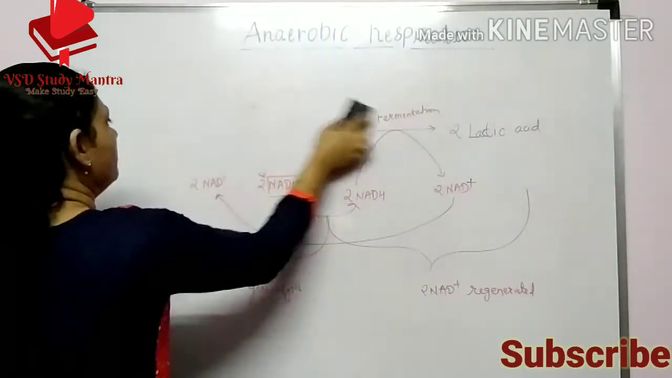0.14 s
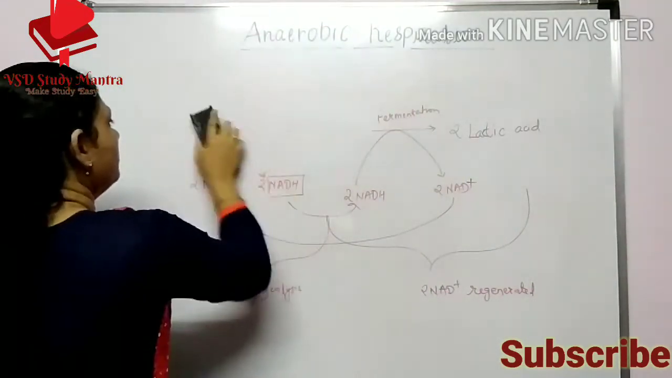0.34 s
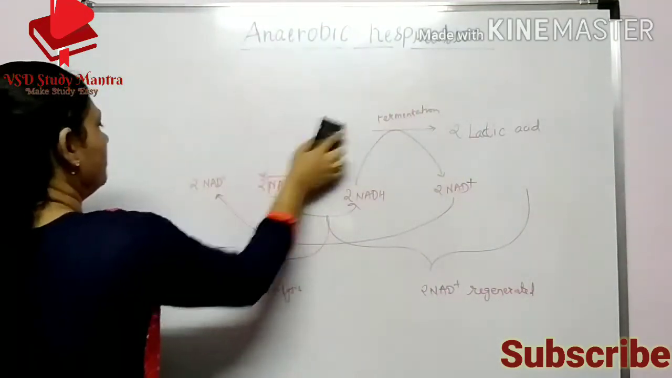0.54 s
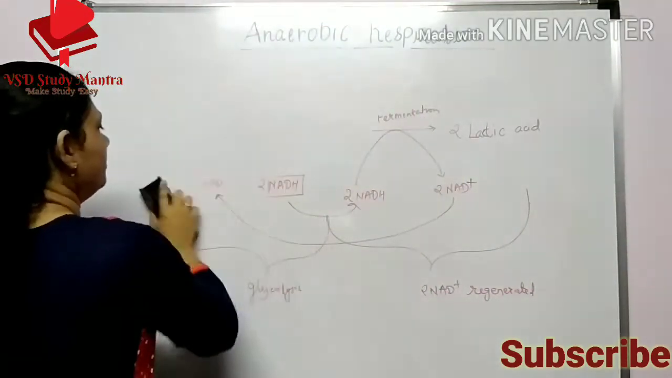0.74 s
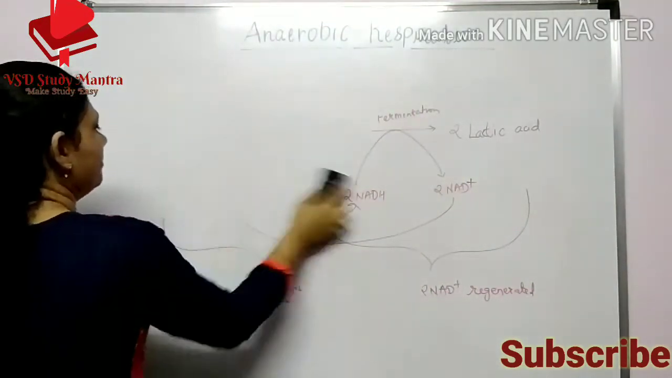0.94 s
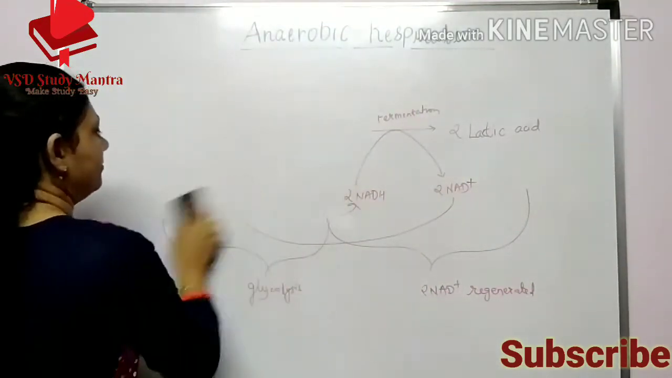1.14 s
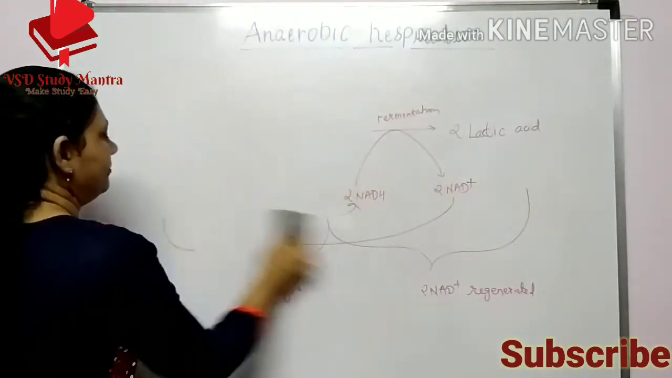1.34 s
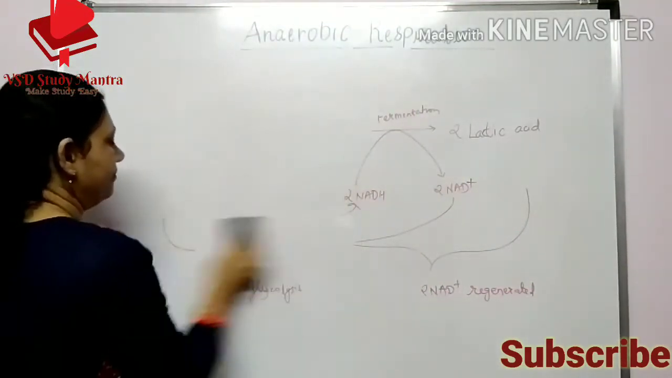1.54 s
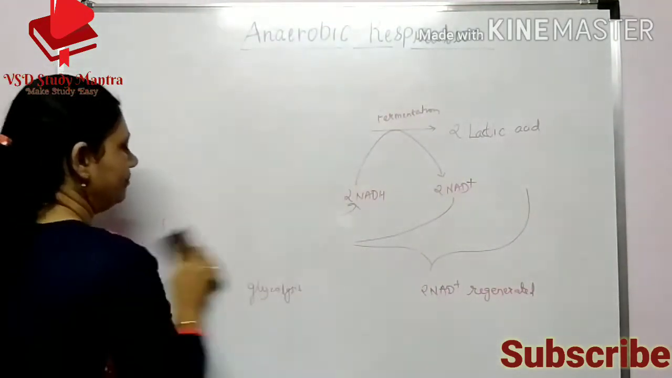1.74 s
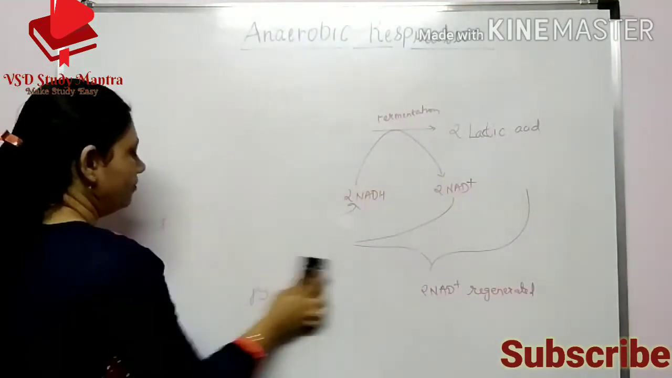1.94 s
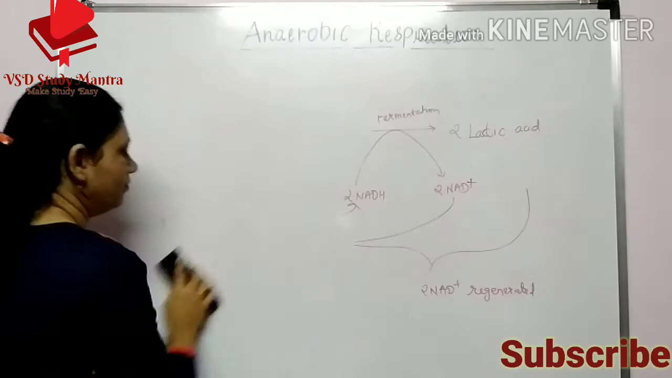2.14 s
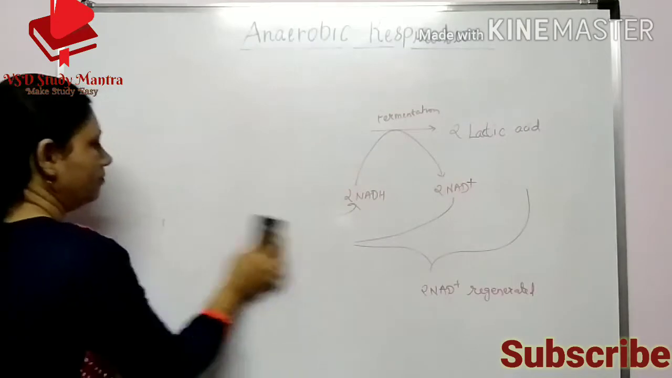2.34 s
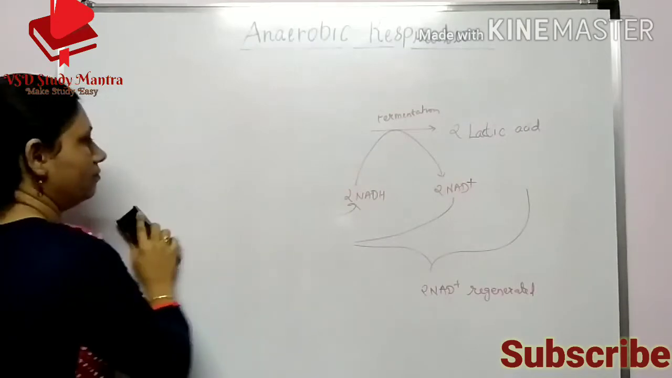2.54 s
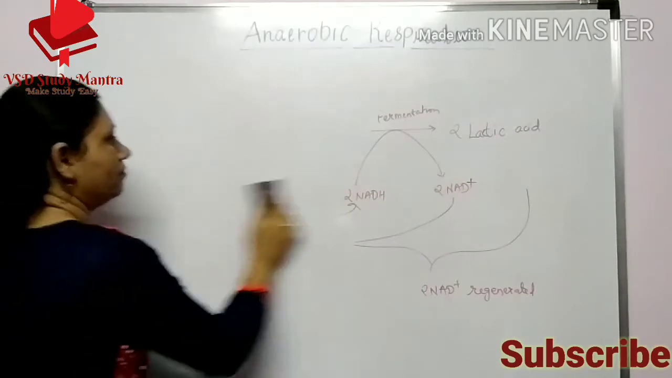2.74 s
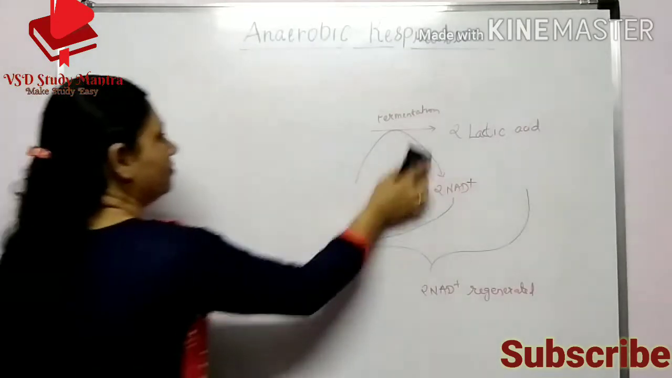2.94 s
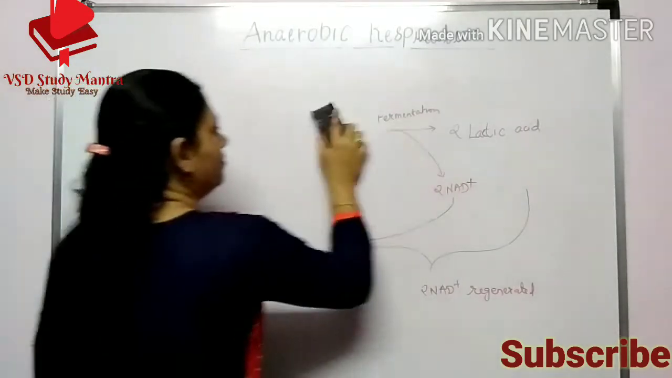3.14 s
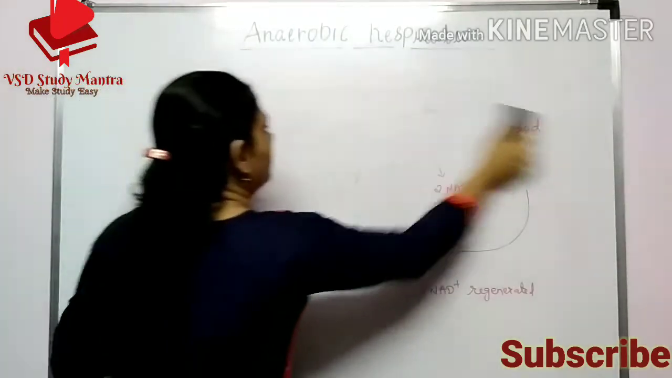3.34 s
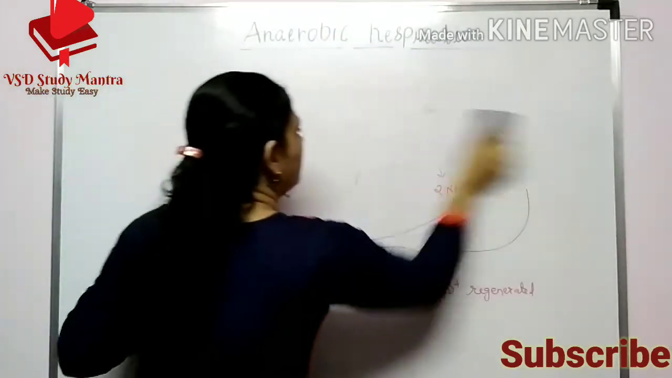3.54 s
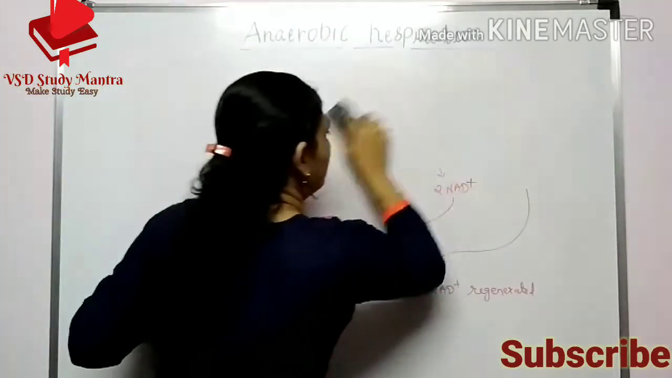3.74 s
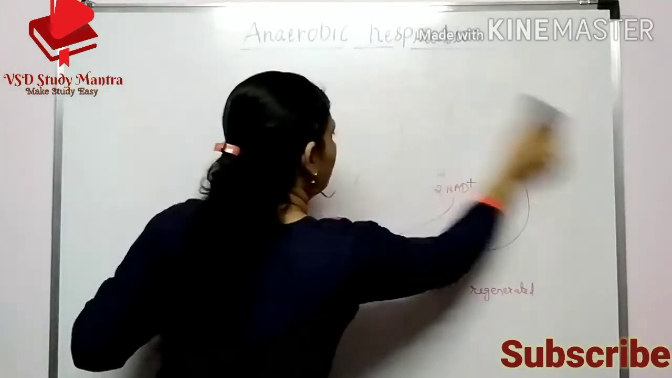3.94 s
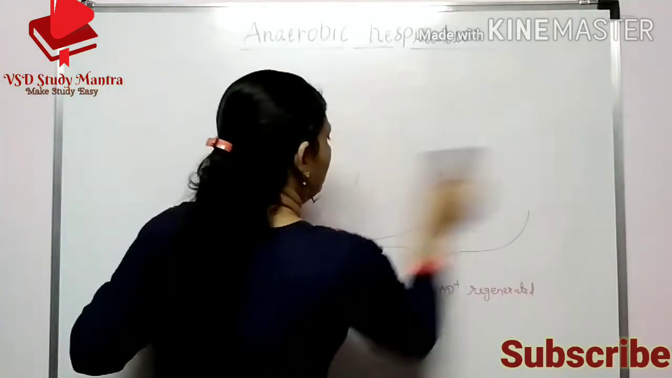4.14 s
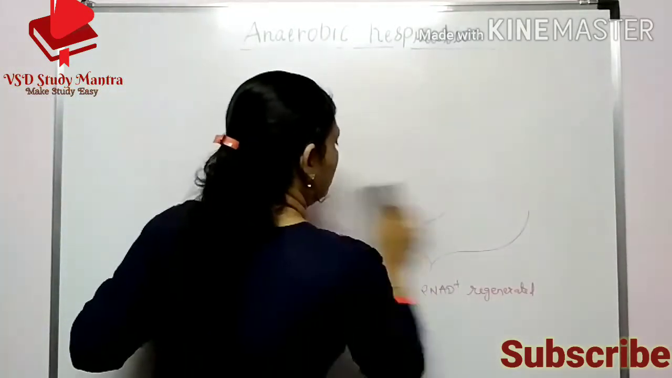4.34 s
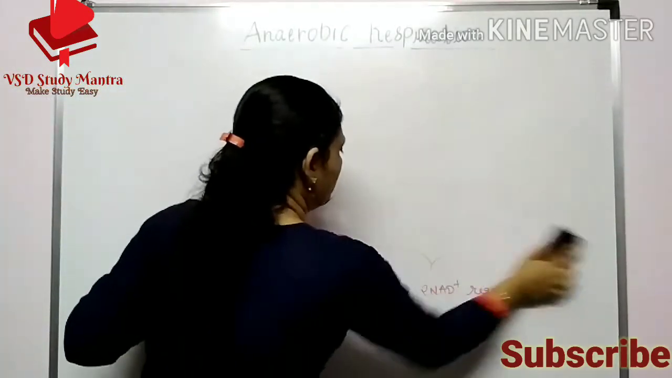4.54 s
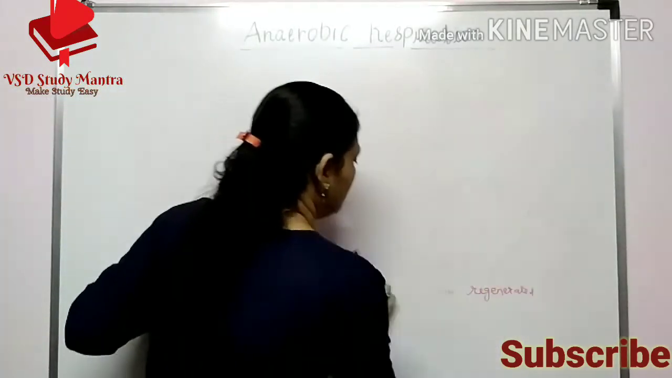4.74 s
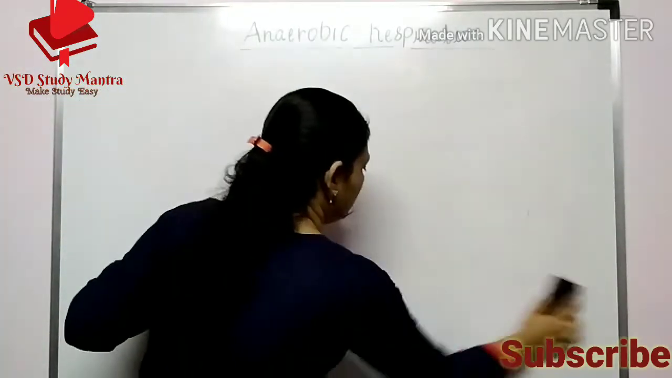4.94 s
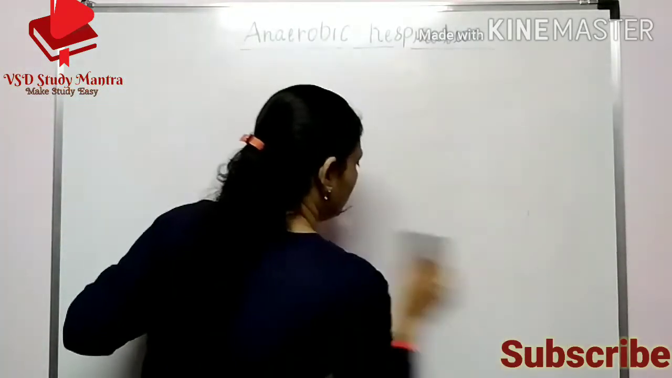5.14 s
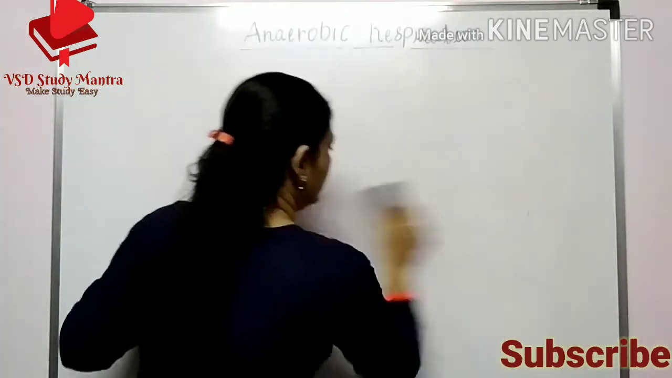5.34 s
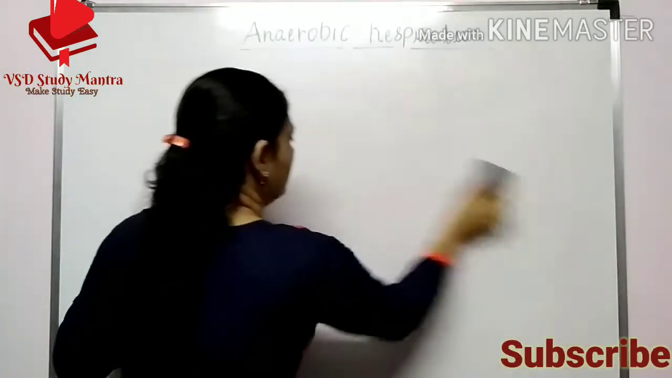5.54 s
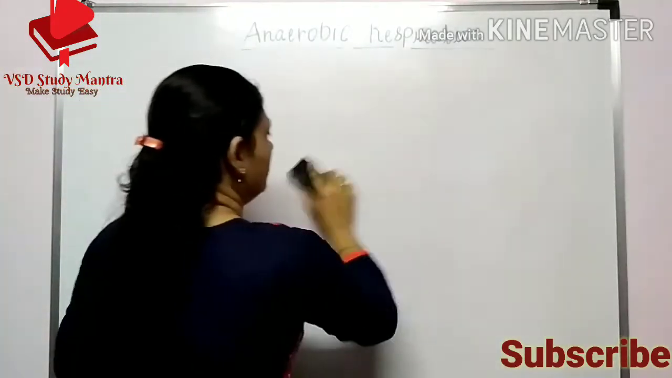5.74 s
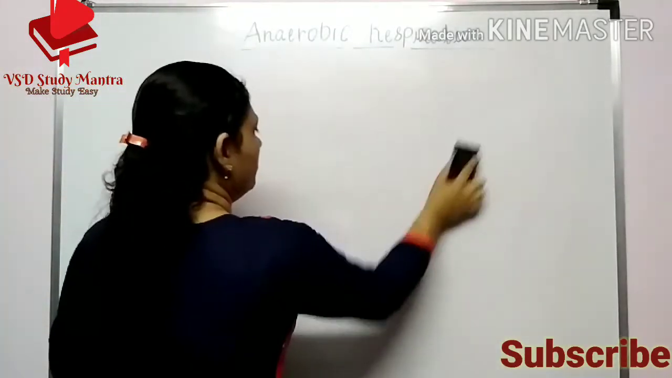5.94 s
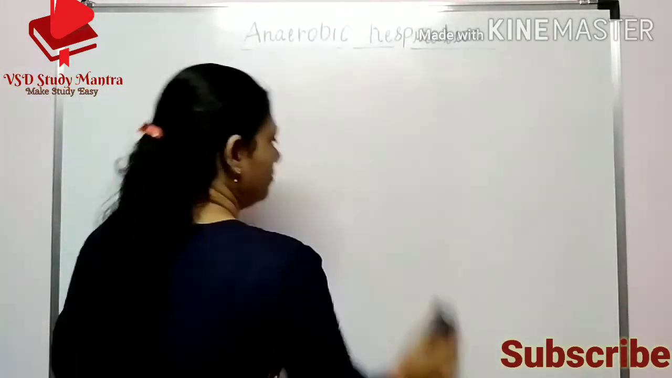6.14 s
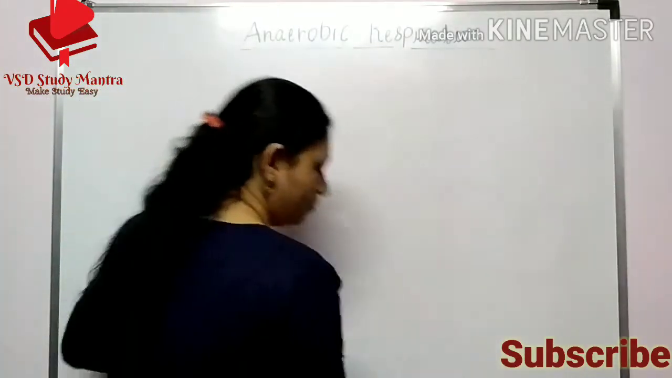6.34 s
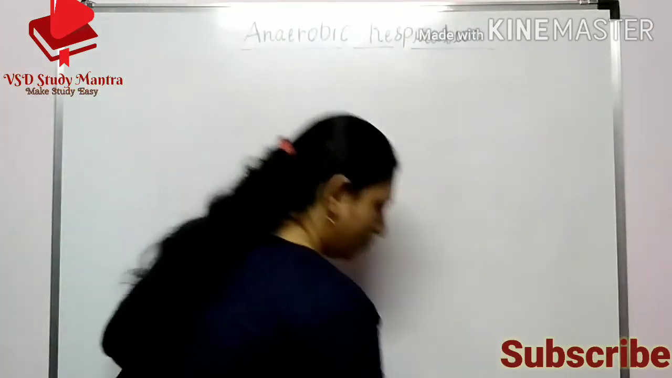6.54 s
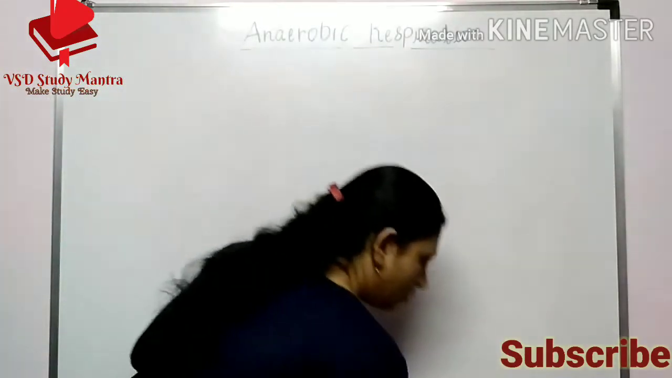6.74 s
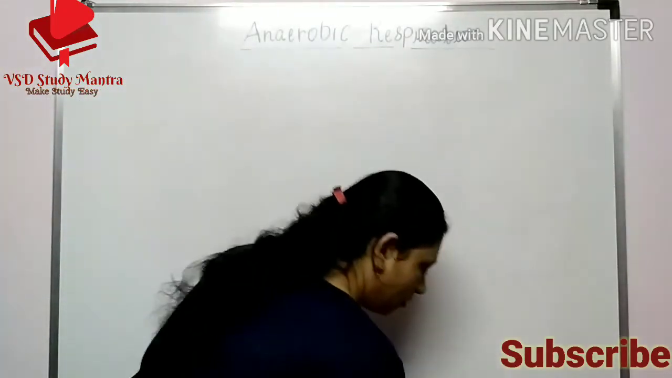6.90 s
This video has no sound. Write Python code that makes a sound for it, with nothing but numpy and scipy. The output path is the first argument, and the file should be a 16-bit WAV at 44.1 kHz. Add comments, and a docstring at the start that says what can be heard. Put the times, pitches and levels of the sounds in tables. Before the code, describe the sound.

Brisk dry rubbing of an eraser block on a wall-mounted whiteboard, about four swishes per second, clattering lightly, ending in near silence and a soft bump.

```python
"""In a bare classroom a felt eraser is rubbed back and forth over a wall-mounted whiteboard.
The felt hisses and rasps with each stroke: noise of many slipping fibres, shaped by speed and pressure.
The block knocks and chatters as decaying board modes; the panel rumbles as resonances shaken by slips.
A low drone of noise and hum fades early on, and soft bumps are short bursts of resonant noise.
At the end a sleeve rustles as filtered grit and a bangle rings faintly as narrow bands of noise."""
import sys
import numpy as np
from scipy import signal
from scipy.fft import rfft, irfft
from scipy.io import wavfile
from scipy.ndimage import uniform_filter1d

SR = 44100
rng = np.random.default_rng(int(sys.argv[2]) if len(sys.argv) > 2 else 0)


def put_to_file(sound):
    """Save the sound as 16-bit audio at rate SR, in the file named by the first command-line argument."""
    columns = np.atleast_2d(sound).T  # one column per channel
    safe = np.clip(columns, -1, 1)
    whole_steps = np.round(safe * 32767)
    wavfile.write(sys.argv[1], SR, whole_steps.astype(np.int16))


N = 307377
TIME = np.arange(N) / SR
HZ = np.fft.rfftfreq(N, 1 / SR)

# modes of board and block: (frequency [Hz], relative level [dB], decay time t60 [s])
BOARD_MODES = [(355, -10, 0.11), (544.6, 20.5, 0.08), (590, 12.5, 0.081), (653, 15, 0.08), (701, 18, 0.055),
               (767, 12, 0.067), (821, 6.5, 0.14), (920, 6, 0.021), (1072, -5.5, 0.12), (1170, 0, 0.064),
               (1410, -7.5, .07), (1610, -16.5, 0.098)]
# how well the panel radiates knocks and chatter: (frequency [Hz], relative level [dB])
PANEL_RADIATION = [(60, -24), (250, -41), (450, -6.5), (1500, 1), (3000, -12), (8000, -34)]


def amp(db):
    """Decibels to gain."""
    return 10 ** (np.asarray(db) / 20)


def unit(x):
    """Scales a sound so that the mean of its channels has rms 1."""
    return x / np.sqrt(np.mean(np.atleast_2d(x).mean(0) ** 2) + 1e-30)


def read(points, hz):
    """Reads a table by pitch on a log-frequency axis."""
    f, value = np.transpose(points)
    return np.interp(np.log(hz + 1), np.log(f + 1), value)


def level(s, db):
    """A curve in dB as a gain, dying away at 200 dB/s after its last point."""
    return amp(np.interp(TIME, s, db) - 200 * np.maximum(TIME - s[-1], 0))


def swell(start, rise_s, hold_s, fall_db_per_s):
    """An envelope that rises, holds and dies away; the hold is counted from the start of the rise."""
    t = TIME - start
    return np.clip(t / rise_s, 0, 1) * amp(-fall_db_per_s * np.maximum(t - hold_s, 0))


def add(mix, s, sound):
    """Mixes a sound in at time s."""
    part = mix[..., max(round(s * SR), 0):][..., :sound.shape[-1]]
    part += sound[..., :part.shape[-1]]


def colour(x, spectrum):
    """Filters by a spectrum table, to rms 1."""
    return unit(irfft(rfft(x) * amp(read(spectrum, HZ)), N))


def diffuse(pair):
    """Two unrelated signals become one diffuse field: alike in the bass, unrelated in the treble."""
    # the spaced microphone pair: (frequency [Hz], left-right likeness [0-1])
    pair_likeness = [(60, .93), (130, .85), (290, .62), (640, .42), (1300, 0), (16000, 0)]
    size = pair.shape[-1]
    a, b = rfft(pair)
    same = read(pair_likeness, np.fft.rfftfreq(size, 1 / SR))
    mid = a * np.sqrt((1 + same) / 2)
    side = b * np.sqrt((1 - same) / 2)
    return irfft(np.array([mid + side, mid - side]), size)


def noise(spectrum):
    """Diffuse noise of a given colour."""
    return colour(diffuse(rng.standard_normal((2, N))), spectrum)


def waver(rate_hz, depth_db, slowest_hz=0):
    """A random gain of mean power 1 that wanders between two rates."""
    band = (HZ >= slowest_hz) / (1 + (HZ / rate_hz) ** 4)
    wander = unit(irfft(rfft(rng.standard_normal(N)) * band, N))
    return unit(amp(depth_db * wander))


def slips(per_s, spread_db):
    """Tiny stick-slip impulses of either sign, whose sizes are spread at random in dB."""
    size = amp(spread_db * np.minimum(rng.exponential(1, N), 4))
    happens = rng.random(N) < per_s / SR
    return unit(size * rng.choice([-1., 1.], N) * happens)


def resonate(x, hz, width_hz):
    """A resonance of gain 1 that follows the curve hz."""
    turn = np.exp(2j * np.pi * np.cumsum(hz * np.ones(x.shape[-1])) / SR)
    r = np.exp(-np.pi * width_hz / SR)
    # shift the pitch to zero, smooth, and shift it back
    return 2 * (turn * signal.lfilter([1 - r], [1, -r], x / turn)).real


def patchy(x, depth_db, width_hz, length_s):
    """Peaks and hollows come and go in the spectrum; the depth is one number or a table by pitch."""
    hz, t, z = signal.stft(x, SR, nperseg=1024, noverlap=768)
    across, along = np.fft.fftfreq(len(hz), hz[1])[:, None], np.fft.rfftfreq(len(t), t[1])
    blur = np.exp(-(across * width_hz) ** 2 - (along * length_s) ** 2)
    field = np.fft.irfft2(np.fft.rfft2(rng.standard_normal(z.shape[1:])) * blur, z.shape[1:])
    depth = read(depth_db, hz)[:, None] if np.ndim(depth_db) else depth_db
    # peaks are capped, hollows are not
    gain = amp(depth * np.minimum(field / field.std(), 1))
    gain /= np.sqrt(np.mean(gain ** 2, 1, keepdims=True))
    return signal.istft(z * gain, SR, nperseg=1024, noverlap=768)[1][:, :N]


def room_tail():
    """Dense reflections from bare walls, each band dying at its own speed; energy 1."""
    # the room: (frequency [Hz], decay time t60 [s])
    room_decay = [(150, 0.094), (700, 0.3), (3000, 0.18), (10000, 0.12), (16000, 0.74)]
    size = SR // 3
    echoes = rng.standard_normal((2, size)) * (rng.random((2, size)) < 3000 / SR)
    hz, t, z = signal.stft(diffuse(echoes), SR, nperseg=256)
    t60 = read(room_decay, hz)[:, None]
    tail = signal.istft(z * amp(-60 * t / t60) / np.sqrt(t60), SR, nperseg=256)[1]
    tail[:, :SR // 300] = 0  # no reflection in the first 3.3 ms
    return tail / np.linalg.norm(tail[0])


def in_room(x, wet_db):
    """Direct sound plus the room's answer, at about the same power."""
    wet = signal.fftconvolve(np.atleast_2d(x), room_tail(), axes=1)[:, :x.shape[-1]]
    return (x + amp(wet_db) * wet) / np.hypot(1, amp(wet_db))


def room_wash(x, fade_s):
    """A moving source never excites the room the same way twice: a wash of noise trails its power."""
    keep = np.exp(-1 / (fade_s * SR))
    power = signal.lfilter([1 - keep], [1, -keep], (x ** 2).mean(0))
    return np.sqrt(power) * diffuse(rng.standard_normal((2, N)))


def still_air():
    """The air of the room at rest: steady diffuse noise, strongest in the bass."""
    # (frequency [Hz], relative level [dB])
    air_colour = [(25, -5), (70, -7), (190, -0.5), (500, -17), (750, -13.5), (1100, -18.5), (4500, -22.5),
                  (11000, -17), (15000, -23.5)]
    return amp(-88) * noise(air_colour)


def soft_bumps():
    """Soft bumps against board and wall: short bursts of noise through a twofold resonance, in the room."""
    # (time [s], level before the room [dB], length [s], frequency [Hz])
    bump_list = [(2.844, -76, 0.067, 130), (3.366, -74, 0.13, 160), (4.59, -73, 0.15, 122),
                 (5.377, -73.5, 0.15, 146), (6.023, -78.5, 0.12, 127), (6.359, -80, 0.086, 553),
                 (6.378, -82.5, 0.15, 697), (6.514, -76.5, 0.05, 144), (6.666, -87, 0.12, 358),
                 (6.937, -63, 0.034, 123.4), (6.96, -49, 0.015, 206.5)]
    out = np.zeros(N)
    for s, db, length, hz in bump_list:
        push = rng.standard_normal(SR // 2)
        ring = resonate(resonate(push, hz, width_hz=63), hz, width_hz=63)
        size = int(length * SR)
        burst = ring[-size:] * signal.windows.tukey(size, .35)
        add(out, s, amp(db) * unit(burst))
    return in_room(out, wet_db=-5.5)


def drone():
    """A low band of noise, in which a hum of unsteady pitch comes forward and recedes."""
    # levels: (time [s], noise level [dB], hum level [dB])
    drone_levels = [(0.0, -61.5, -79), (0.22, -83, -79), (0.32, -73, -72), (0.7, -72.5, -75),
                    (0.88, -66.5, -85), (1.25, -76.5, -82), (1.5, -72.5, -66), (1.75, -77, -74.5),
                    (2.03, -73.5, -93), (2.25, -85, -92), (2.55, -102, -105)]
    # noise band: (frequency [Hz], relative level [dB])
    drone_band = [(25, -23), (50, -20), (80, -23.5), (100, -5), (122, -3), (150, -1.5), (200, -20),
                  (500, -35)]
    s, noise_db, hum_db = np.transpose(drone_levels)
    hum_hz = 122 * waver(rate_hz=4.2, depth_db=0.15)
    phase = 2 * np.pi * np.cumsum(hum_hz) / SR
    hum = unit(np.sin(phase)) * waver(rate_hz=6, depth_db=-5.5)
    return level(s, hum_db) * hum + level(s, noise_db) * noise(drone_band)


def sleeve():
    """As the arm drops, cloth catches in a few quick, gritty brushes: slips filtered to the cloth's colour."""
    # (start [s], length [s], level [dB])
    brush_list = [(6.47, 0.028, -81), (6.501, 0.015, -69), (6.545, 0.015, -82.5)]
    # (frequency [Hz], relative level [dB])
    cloth_colour = [(1000, -21), (2000, -11), (3000, -3), (3700, -11), (4300, -39), (6000, -12), (8000, 1),
                    (11000, 7), (15000, -1.5)]
    brush = sum(amp(db) * swell(s, rise_s=0.015, hold_s=hold, fall_db_per_s=169.5)
                for s, hold, db in brush_list)
    grit = in_room(slips(per_s=5400, spread_db=-1.0), wet_db=7.0)
    return brush * colour(grit, cloth_colour) * waver(rate_hz=80, depth_db=2.5)


def bangle():
    """A thin bangle rings on as it slides down the wrist: noise through two narrow resonances in a row per
    mode."""
    # (frequency [Hz], relative width, level [dB], time that it rings while sliding [s])
    bangle_modes = [(2390, 42, -86, 0.023), (3320, 70, -89, 0.023), (3840, 32, -87, 0.14),
                    (7720, 70, -93, 0.15), (8800, 120, -83, 0.04), (11020, 420, -86, 0.19),
                    (12790, 60, -92, 0.16)]
    out = np.zeros((2, N))
    for hz, width, db, hold in bangle_modes:
        width_hz = 1.5 * width  # of each of two resonances in a row
        ring = unit(resonate(resonate(rng.standard_normal((2, N)), hz, width_hz), hz, width_hz))
        out += amp(db) * ring * swell(6.505, rise_s=0.027, hold_s=hold, fall_db_per_s=179)
    return out


def rumble(dragging):
    """Dragging shakes the whole panel, in shudders where the pad grabs; the press point sets its resonance."""
    # shudders: (start [s], length [s], relative level [dB], panel resonance at that spot [Hz])
    shudder_list = [(0.08, 0.082, -69.5, 180), (0.285, 0.044, -70.5, 290), (0.58, 0.099, -65.5, 187),
                    (0.75, 0.071, -51.5, 370), (0.846, 0.11, -57.5, 180), (0.976, 0.14, -60, 190),
                    (1.29, .04, -67, 162), (1.59, .09, -67, 170), (1.745, 0.096, -62, 268),
                    (2.027, 0.073, -67, 171), (2.197, 0.051, -71, 286), (2.367, 0.049, -68, 340),
                    (2.463, 0.06, -67, 310), (2.607, 0.06, -71.5, 325), (2.83, 0.15, -65, 247),
                    (3.398, 0.098, -60.5, 365), (3.565, 0.06, -79, 200), (3.633, 0.075, -71.5, 276),
                    (4.084, 0.094, -66, 255), (4.24, 0.063, -69, 327), (4.376, 0.046, -61, 387),
                    (4.548, 0.11, -63.5, 188), (4.847, 0.12, -64, 195), (5, 0.11, -68.5, 197),
                    (5.374, 0.22, -71.5, 178), (5.805, 0.055, -60.5, 360), (5.886, 0.033, -69, 206),
                    (6.115, 0.039, -68, 225)]
    # (frequency [Hz], relative level [dB])
    rumble_colour = [(30, -45.5), (70, -36), (105, -10), (150, 7), (200, 4.5), (270, 3.5), (400, 5.5),
                     (520, -11), (800, -25.5), (1500, -59)]
    s, length, _, hz = np.transpose(shudder_list)
    grabbing = sum(amp(db) * swell(start, rise_s=0.013, hold_s=hold, fall_db_per_s=241.5)
                   for start, hold, db, _ in shudder_list)
    judder = slips(per_s=560, spread_db=-3.5)
    judder = judder + amp(9.5) * room_wash(judder[None], fade_s=0.018)
    spot_hz = np.interp(TIME, s + length / 2, hz)
    panel = resonate(resonate(judder, spot_hz, width_hz=200), spot_hz, width_hz=246)
    panel_hz = 328  # a resonance that sounds wherever the panel is pressed
    panel += amp(-15) * resonate(resonate(judder, panel_hz, width_hz=40), panel_hz, width_hz=40)
    steady = amp(-5.5) * dragging * waver(rate_hz=11, depth_db=4.5)
    return np.hypot(steady, amp(-6.0) * grabbing) * colour(panel, rumble_colour)


def board_ring(hardness_db, detune, uneven_db, tuning=1):
    """The modes of one blow: hardness tilts them in dB per octave, each spot weighs and tunes them anew."""
    t = np.arange(SR // 3) / SR
    ring = np.zeros(len(t))
    chances = rng.standard_normal((len(BOARD_MODES), 2))
    for (hz, db, t60), (shift, weight) in zip(BOARD_MODES, chances):
        octaves = np.log2(hz / BOARD_MODES[2][0])
        start_db = db + hardness_db * octaves + uneven_db * weight
        mode_hz = hz * (tuning + detune * shift)
        ring += amp(start_db - 60 * t / t60) * np.sin(2 * np.pi * mode_hz * t)
    ring *= np.minimum(t / 0.0015, 1)  # the padded block lands over 1.5 ms
    return ring / np.sqrt(np.mean(ring[:SR // 40] ** 2))


def chatter(speed, count=8):
    """The block skips from spot to spot, most where it skids, ringing the board's modes over a dull scuff."""
    # skids: (start [s], length [s], relative level [dB])
    skid_list = [(-0.02, 0.14, -70), (0.508, 0.19, -74.5), (0.703, 0.38, -64), (1.14, 0.2, -70.5),
                 (1.355, .18, -73), (2.596, 0.018, -70.5), (2.835, 0.37, -72), (3.34, 0.45, -67),
                 (3.91, 0.32, -67), (4.222, 0.44, -66), (4.683, 0.1, -66.5), (4.886, 0.13, -68),
                 (5.046, 0.21, -70.5), (5.425, 0.28, -67.5), (5.73, 0.14, -60.5), (5.866, 0.09, -67),
                 (5.982, 0.25, -75.5)]
    # (frequency [Hz], relative level [dB])
    scuff_colour = [(200, -51), (420, -10), (520, -2.5), (800, -1.5), (1000, -5.5), (1300, -6),
                    (1800, -14.5), (3500, -37)]
    skidding = sum(amp(db) * swell(start, rise_s=0.023, hold_s=hold, fall_db_per_s=245)
                   for start, hold, db in skid_list)
    ringing, skips = np.zeros(N), slips(per_s=700, spread_db=2.0)
    spot_s = 0.22  # time between one change of spot and the next
    touched = (TIME / spot_s + rng.random(N)).astype(int) % count  # neighbouring spots overlap
    for spot in range(count):
        ring = board_ring(hardness_db=-2.5, detune=0.014, uneven_db=4.0)
        ringing += signal.oaconvolve(skips * (touched == spot), ring)[:N]
    rattle = amp(-6.0) * colour(in_room(ringing, wet_db=0), PANEL_RADIATION)
    scuff = amp(-3) * noise(scuff_colour) * waver(rate_hz=32, depth_db=2.5)
    block = patchy(rattle + scuff, depth_db=5, width_hz=110, length_s=0.086)
    return np.hypot(amp(-51) * speed, skidding) * block


def knocks():
    """The block tips or lands and rocks twice more before it settles; the room answers each spot differently."""
    # (time [s], relative level [dB], hardness as tilt of the modes [dB per octave],
    #  main mode at that spot [Hz])
    knock_list = [(0.029, -57, 5, 507), (0.508, -56, 18.5, 505), (0.912, -53, 6, 590),
                  (0.928, -52, 10.5, 564), (0.989, -44, 13.5, 548), (1.14, -53.5, 10.5, 593),
                  (1.205, -63, 9, 574), (1.464, -55, 0, 521), (1.75, -60, -12, 483), (2.837, -53, 10, 537),
                  (2.937, -52.5, -9.5, 528), (3.032, -50, 8, 549), (3.128, -59, 25.5, 529),
                  (3.449, -46.5, -38, 532), (3.543, -56.5, -26, 528), (3.619, -57.5, 6, 552),
                  (3.676, -47, 12, 544), (3.99, -57, -34, 543), (4.083, -60.5, 21, 549),
                  (4.572, -57.5, 1, 580), (4.635, -59, -12, 550), (4.888, -55, -23, 530),
                  (4.933, -57, -6, 552), (4.989, -49, -24, 543), (5.384, -52.5, -22, 525),
                  (5.488, -51.5, -2, 527), (5.71, -43.5, 12.5, 534)]
    out = np.zeros((2, N))
    chances = rng.uniform(.7, 1.3, (len(knock_list), 3))
    for (s, db, hardness_db, hz), chance in zip(knock_list, chances):
        blow = np.zeros(SR // 3)
        tuning = hz / BOARD_MODES[1][0]
        for rock, spread in enumerate(chance):
            ring = board_ring(hardness_db, detune=0.0086, uneven_db=3.0, tuning=tuning)
            add(blow, 0.009 * rock * spread, amp(db - 8.0 * rock) * ring)
        add(out, s, in_room(blow, wet_db=3.5))
    # the panel radiates its lowest modes poorly and those near 1.5 kHz best
    return amp(-1.0) * irfft(rfft(out) * amp(read(PANEL_RADIATION, HZ)), N)


def strokes():
    """Gains of hiss, rasp and rumble: the hand speeds up and slows down in one arch per stroke, then lifts."""
    # each stroke lasts from one turn of the hand to the next:
    # (start [s], place of top speed within the stroke [0-1], hiss at the turn [relative dB],
    #  hiss at top speed [relative dB], rasp at the turn [relative dB],
    #  rasp at top speed [relative dB], rumble [relative dB])
    stroke_list = [(-0.096, 0.15, -35.5, -42.5, -66, -58.5, -79), (0.21, 0.8, -49, -46.5, -63.5, -60, -76),
                   (0.446, 0.53, -50.5, -43, -64.5, -60, -93), (0.659, 0.3, -48.5, -45.5, -63.5, -65, -83),
                   (0.856, 0.67, -56.5, -43, -70.5, -57.5, -73), (1.114, 0.29, -47.5, -45, -61, -63.5, -70),
                   (1.315, 0.56, -55, -43, -69, -59.5, -72), (1.585, 0.26, -48, -46, -61, -61.5, -74),
                   (1.794, 0.63, -56, -42.5, -68, -58.5, -67.5),
                   (2.06, 0.15, -47.5, -45.5, -64.5, -60.5, -75),
                   (2.237, 0.8, -55.5, -43, -65.5, -59.5, -85), (2.424, 0.27, -48, -47, -60.5, -60.5, -80),
                   (2.69, 0.84, -56.5, -42, -67.5, -58, -86), (2.929, 0.9, -45.5, -47.5, -61, -65, -89),
                   (3.217, 0.36, -50.5, -43.5, -64, -62, -82), (3.58, 0.76, -55.5, -44.5, -65, -61, -76),
                   (3.819, 0.24, -49.5, -44.5, -65.5, -61.5, -92),
                   (4.166, 0.8, -52.5, -46.5, -63.5, -64, -82),
                   (4.374, 0.38, -49.5, -44.5, -66.5, -62, -76), (4.654, 0.6, -52.5, -46, -65, -64, -77),
                   (4.87, 0.38, -48, -45, -65.5, -62.5, -82), (5.119, 0.64, -53.5, -45.5, -65.5, -64, -77),
                   (5.359, 0.46, -48.5, -44, -67, -61, -76), (5.613, 0.65, -55.5, -44.5, -66, -62.5, -84),
                   (5.821, 0.47, -47, -43, -62, -61, -84), (6.041, 0.47, -49.5, -47, -68, -64.5, -81)]
    lift_s, lift_db_per_s = 6.188, 137  # the hand lifts off
    clear_s, clear_db_per_s = 6.33, 133  # the last fibres leave the board, and the rub dies faster
    arch_power = 1.36
    rasp_lag_s = 0.01  # pressure trails speed
    rumble_follows = 0.31  # dB of rumble for one dB of hiss as the hand slows
    regrip_s = 0.026  # pressure passes from one stroke to the next over this time
    start, fastest, turn_db, top_db, rasp_turn_db, rasp_top_db, rumble_db = np.transpose(stroke_list)
    top_s = start + np.clip(fastest, .05, .95) * np.diff(start, append=lift_s)
    marks = np.append(np.column_stack([start, top_s]), lift_s)
    # whole numbers at the turns, halves at top speed
    travel = np.interp(TIME, marks, np.arange(len(marks)) / 2)
    now = np.minimum(travel.astype(int), len(start) - 1)
    slowing = 1 - abs(np.sin(np.pi * travel)) ** arch_power
    slowing_db = slowing * (np.interp(TIME, start, turn_db) - top_db[now])
    rasp_slowing_db = slowing * (np.interp(TIME, start, rasp_turn_db) - rasp_top_db[now])
    rasp_db = np.interp(TIME - rasp_lag_s, TIME, rasp_top_db[now] + rasp_slowing_db)
    drag_db = uniform_filter1d(rumble_db[now] + rumble_follows * slowing_db, int(regrip_s * SR))
    lifting_db = lift_db_per_s * np.maximum(TIME - lift_s, 0)
    clearing_db = clear_db_per_s * np.maximum(TIME - clear_s, 0)
    contact = amp(-lifting_db - clearing_db)
    return contact * amp([top_db[now] + slowing_db, rasp_db, drag_db])


def fibres(per_s, spread_db, grip_db, wash_db):
    """Fibre slips at the two microphones: a wide pad gives each its own scatter, under one flickering grip."""
    grip = waver(rate_hz=550, depth_db=grip_db, slowest_hz=86.0)
    scatter = diffuse(np.array([slips(per_s, spread_db) for port in range(2)])) * grip
    return scatter + amp(wash_db) * room_wash(scatter, fade_s=0.013)


def felt(speed, pressure):
    """Thousands of fibres catch and let go: a bright hiss from speed, a lower rasp from pressure."""
    # spectra: (frequency [Hz], relative level [dB])
    hiss_colour = [(1500, -56.5), (2800, -11), (3600, -12), (4400, -7), (5200, -9), (6300, -6.5),
                   (7500, -4.5), (8800, -1), (10900, 1), (12000, -1.5), (13500, -5), (15400, -8)]
    rasp_colour = [(300, -34), (700, -10), (1100, -6), (1450, -3), (2000, 2), (2650, 3.5), (3100, 1.5),
                   (3600, -4), (5000, -18.5), (9000, -27)]
    # passing peaks and hollows: (frequency [Hz], depth [dB])
    hiss_patches = [(2000, -1.5), (4000, 17.5), (6500, 12.5), (8500, 5.7), (12000, 3.5), (15000, 0.5)]
    rasp_patches = [(800, 2.6), (2000, 4.2), (3500, 8.1)]
    # the rub turns hollow on some strokes: (time [s], depth of the dip [0-1], its centre [Hz])
    hollow_dips = [(0.15, 0, 563), (0.25, .7, 540), (0.47, 0.4, 540), (0.55, 0, 560), (1.5, 0.2, 700),
                   (1.65, 0.7, 780), (1.8, 1, 1200), (1.91, 0.8, 1130), (2.02, 0.5, 900),
                   (2.25, 0.85, 1090), (2.36, 1, 1010), (2.55, 0, 700), (2.68, 1, 640), (2.79, 0.8, 653),
                   (2.84, 0, 600)]
    bright = colour(fibres(per_s=14000, spread_db=0.5, grip_db=3.5, wash_db=6), hiss_colour)
    hiss = speed * patchy(bright, hiss_patches, width_hz=40, length_s=0.057)
    coarse = colour(fibres(per_s=9000, spread_db=2.2, grip_db=2.5, wash_db=-1.5), rasp_colour)
    rasp = amp(2.0) * pressure * patchy(coarse, rasp_patches, width_hz=76, length_s=0.073)
    # taking away a resonance leaves a broad dip in the rasp
    s, depth, hz = np.transpose(hollow_dips)
    dip = np.interp(TIME, s, depth) * resonate(rasp, np.interp(TIME, s, hz), width_hz=420)
    return hiss + rasp - dip


def scene():
    """Room, sleeve, board and eraser, from the background to the rub itself."""
    speed, pressure, dragging = strokes()
    background = still_air() + soft_bumps() + drone()
    arm = sleeve() + bangle()
    board = rumble(dragging) + chatter(speed) + knocks()
    return background + arm + board + felt(speed, pressure)


def record(dry):
    """The two microphone ports differ in colour; then a low-pass limits the band."""
    # (frequency [Hz], left minus right [dB])
    port_lean = [(60, 6), (200, -4), (700, -1), (1300, 1), (2400, -2), (4400, 0.1), (7400, -0.6),
                 (9000, -3), (10200, 0), (11700, 5), (15000, 5)]
    lean_db = read(port_lean, HZ) / 2
    ports = amp(np.array([lean_db, -lean_db]))
    coloured = irfft(rfft(dry) * ports / np.sqrt(np.mean(ports ** 2, 0)), N)
    low_pass = signal.firwin(1023, 15520, window=("kaiser", 9), fs=SR)  # cutoff in Hz
    return signal.oaconvolve(coloured, low_pass[None], "same", axes=1)


dry = scene()
out = record(dry)
put_to_file(out)
```